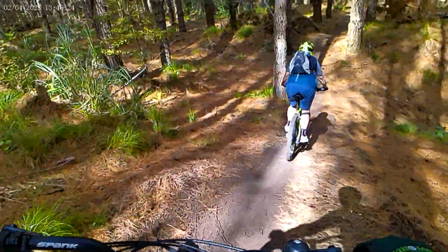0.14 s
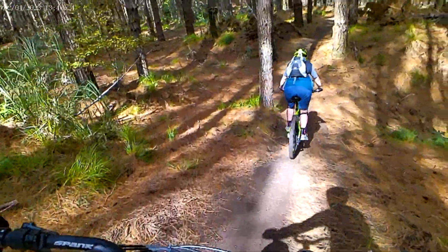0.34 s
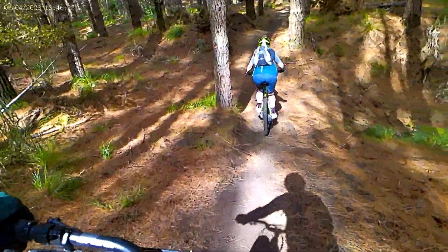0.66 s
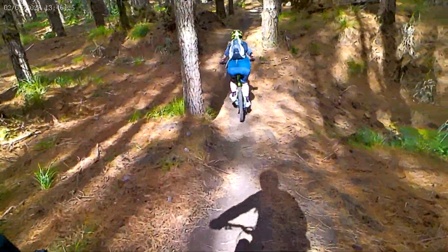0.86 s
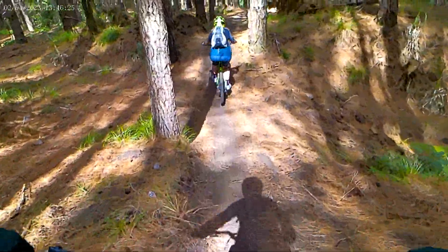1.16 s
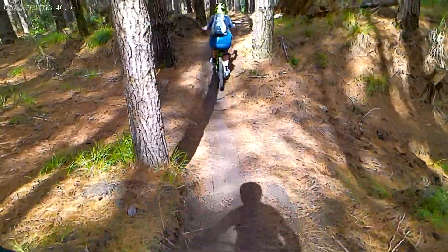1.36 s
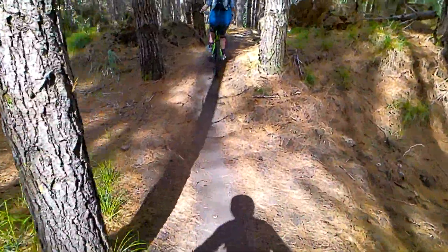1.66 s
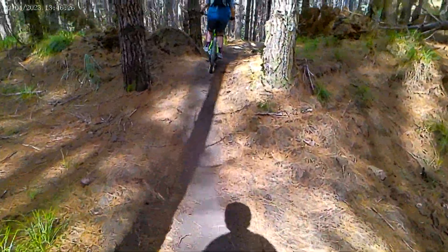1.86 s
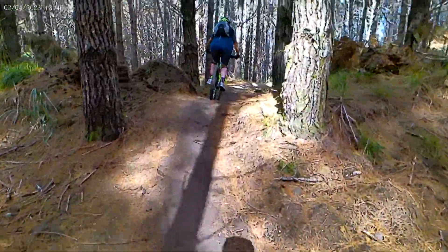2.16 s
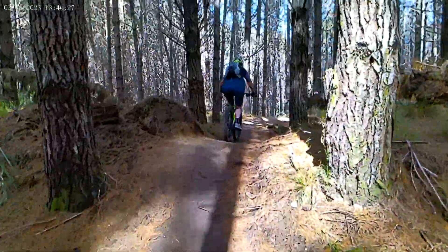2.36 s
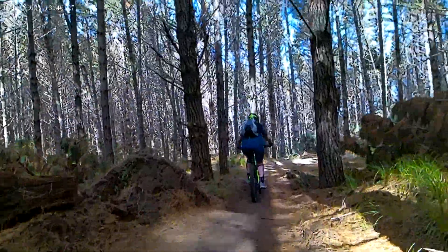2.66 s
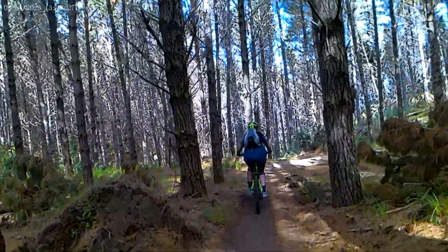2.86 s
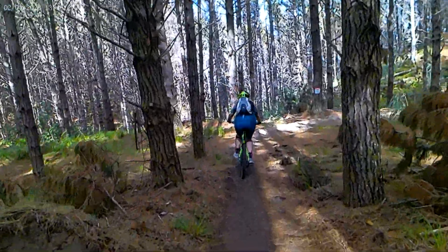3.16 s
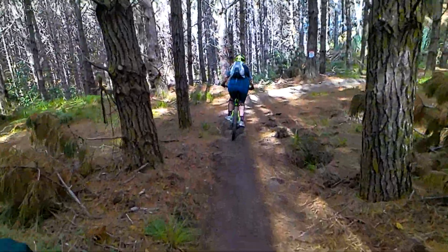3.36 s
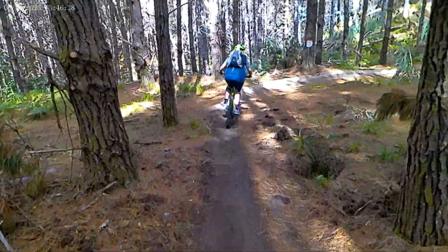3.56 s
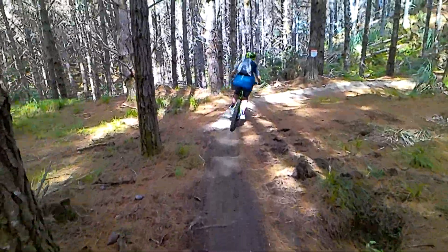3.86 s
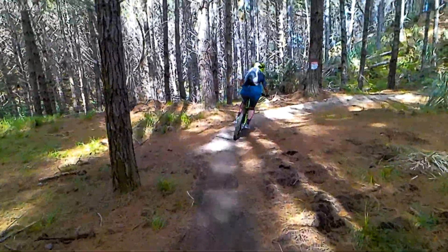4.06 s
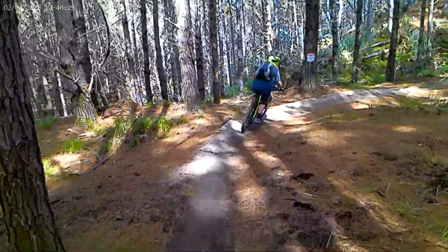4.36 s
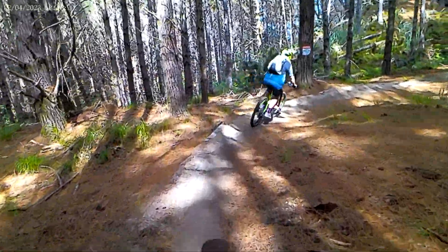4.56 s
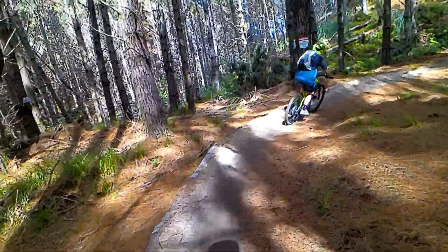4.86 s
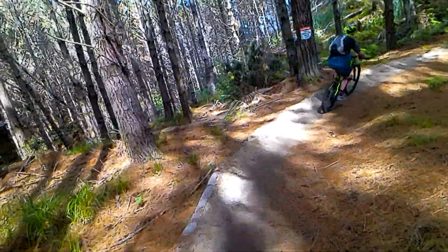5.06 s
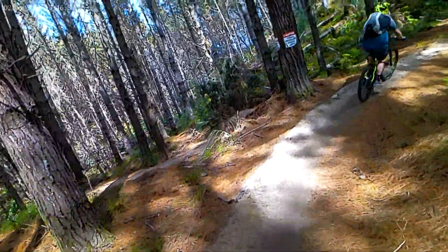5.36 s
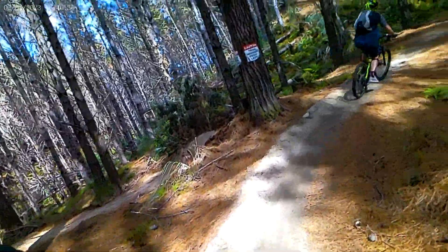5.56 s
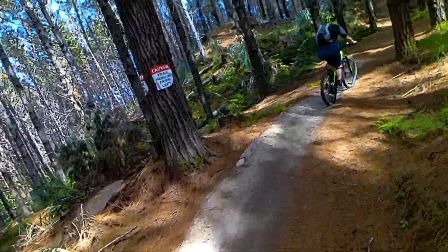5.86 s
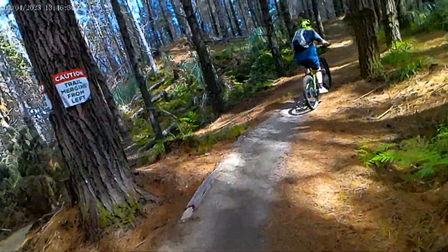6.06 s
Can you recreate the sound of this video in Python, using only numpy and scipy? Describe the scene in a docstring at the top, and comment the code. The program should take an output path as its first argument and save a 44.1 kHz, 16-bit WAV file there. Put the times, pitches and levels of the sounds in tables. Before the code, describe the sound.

Deep, dull jolts shake a close microphone as a bike runs along a dirt trail outdoors. Early bumps are modest; between about 1.4 and 2.6 seconds they become heavy knocks, the hardest clipped and sharp. Later come isolated thuds, a flurry of tiny metallic rattles, a low wind swell and a faint freewheel whirr near the end. Tyre noise and hiss stay low and constant, everything dry.

```python
"""A camera worn by the rider heaves, shudders and thumps as a mountain bike rolls down a packed dirt trail.
Bumps are slow damped swings led by mount and shell rings; knocks on the mount's stop overload at their hardest.
Chain and cables are bouncing clicks that ring frame, links and shell; random pawl ticks ring the hub as a whirr.
Tyres hum, crunch and scuff as shaped noise, over a rumbling wind and a steady hiss."""
import sys
import numpy as np
from scipy import signal
from scipy.fft import rfft, irfft
from scipy.io import wavfile
from scipy.ndimage import map_coordinates

SR = 44100
rng = np.random.default_rng(int(sys.argv[2]) if len(sys.argv) > 2 else 0)


def generate_wav(sig):
    """Save sig (samples, or channels by samples) to the path in sys.argv[1] as 16-bit PCM at SR."""
    pcm = np.round(np.clip(np.atleast_2d(sig).T, -1, 1) * 32767).astype(np.int16)
    wavfile.write(sys.argv[1], SR, pcm)


N = 273861
TIME = np.arange(N) / SR

# Bumps in the trail. Each row: time in seconds, heave level in dB, sharpness (shudder over heave) in dB.
BUMPS = [(0.22, -19, -6), (.412, -15, -6), (0.611, -25.5, -14.5), (.845, -24.5, -3), (1.205, -25.5, -17.5),
         (1.423, -23.5, -9.5), (1.701, -14, -5), (1.976, -13, -9), (2.13, -19, -9.5), (2.35, -12, -10),
         (2.555, -11, -13), (2.959, -22, -14), (3.469, -8.5, -2.5), (4.078, -14.5, -12.5),
         (4.285, -22, -38), (4.37, -26, -10.5), (4.425, -26.5, -22), (4.64, -23, -5), (4.77, -18.5, -20),
         (5.16, -15, -8.5)]
# The mount meets its stop. Each row: time in seconds, thump level before overload in dB, relative crack in dB.
KNOCKS = [(0.9602, -26.5, -49), (1.464, -10, -40), (1.7255, -3.14, -36), (2.2058, 9, -23.5),
          (2.3931, 16.5, -7), (2.6014, 4, -39), (2.78, -24.5, -46), (3.9256, -2.5, -40), (4.828, -28, -46),
          (5.029, -16.5, -41), (5.2, -25.5, -51), (5.3856, -29, -53), (5.5747, -29.5, -49)]
# Rings of the mount and the camera shell. Each row: pitch in Hz, relative level in dB, 60 dB decay in seconds.
MOUNT_MODES = [(95, -11, .07), (135, -7, .09), (190, 1, .04), (275, -7, .03), (410, -12, .03),
               (560, -22, .02)]
SHELL_MODES = [(300, 1, .035), (440, -9, .03), (710, 3, .022), (860, 3, .017), (1280, -6, .018),
               (2000, 0, .009), (2750, -3, .008), (4900, -10, .005)]
# Chain and cables slap the frame. Each row: time in seconds, relative level in dB, share of bare chain 0-1.
RATTLES = [(.82, -41.5, 0.14), (0.837, -42, 0.3), (.983, -41.5, .4), (1.0064, -37.5, 0.02),
           (1.056, -43, 0.08), (1.091, -41, 0), (1.1295, -43, 0.14), (1.492, -34.5, 0.94),
           (1.669, -43.5, 0.48), (2.882, -38.5, 0.67), (3.27, -40.5, 0.39), (3.3252, -37.5, 0.1),
           (3.543, -44, 0.24), (4.24, -38, 0.27), (4.329, -38.5, 0.5), (4.441, -40.5, .4), (4.58, -34, .75),
           (4.6446, -28.5, 0), (4.671, -36.5, 0.3), (4.721, -36, .15), (4.733, -38, 0),
           (4.759, -40.5, 0.36), (4.794, -36, .2), (4.823, -43, .5), (4.96, -32.5, 0.62),
           (4.971, -30.5, 0.25), (5.0302, -36.5, .1), (5.119, -36.5, .2)]
# Rings of the frame, the chain links and the rear hub.
# Each row: pitch in Hz, relative level in dB, 60 dB decay in seconds.
FRAME_MODES = [(1104, 9, 0.0066), (1337, 1, 0.038), (1497, 1.5, 0.026), (1841, 0.5, 0.034),
               (2117, -6, 0.035), (2700, -4.5, 0.0059)]
LINK_MODES = [(3240, 1, 0.012), (3560, 2, .01), (4270, 3.5, 0.018), (4900, -3, 0.018), (5700, -3, 0.011),
              (6440, -6, 0.022), (8000, -4, .015)]
HUB_MODES = [(1260, 1, 0.018), (2040, -1, .014), (2690, -15, 0.048), (3380, -13.5, 0.03),
             (4340, -28, 0.023), (5000, -15, 0.019), (6700, -12, .014), (8580, -15, 0.022)]
# Coasting. Each row: time in seconds, freewheel whirr level in dB.
COASTING = [(0, -65), (3.9, -67.5), (5.2, -64.5), (5.6, -59), (6.0, -56.5), (6.21, -67)]
# The ground under the tyres. Each row: time in seconds, relative hum in dB, relative crunch in dB.
GROUND = [(0.0, -56, -59.5), (0.41, -53.5, -59), (0.71, -55.5, -60), (1.28, -54, -58.5), (2.09, -52, -55.5),
          (2.28, -50, -59), (2.49, -52, -59), (2.75, -51.5, -57.5), (3.2, -53.5, -58), (3.77, -54, -60),
          (3.98, -51, -62), (4.15, -54.5, -57), (4.93, -50.5, -56.5), (5.08, -52.5, -56), (5.5, -53, -59.5),
          (6.21, -54.5, -57.5)]
# Wind at the microphone. Each row: time in seconds, relative level in dB.
GUSTS = [(0, -46), (.55, -48.5), (1.2, -47.5), (1.75, -48.5), (2.25, -42), (2.85, -43), (3.1, -49),
         (3.46, -42), (3.85, -51), (4.08, -40), (4.45, -45), (4.9, -38.5), (5.14, -34.5), (5.4, -43.5),
         (6.21, -46)]
# Noise colours. Each row: frequency in Hz, relative density in dB per Hz.
HUM_SPECTRUM = [(80, -13.5), (140, 0), (200, -1.5), (250, -9), (295, -2.5), (360, -10.5), (425, -8),
                (470, -14.5), (530, -11.5), (620, -15), (850, -18), (1500, -25.5)]
CRUNCH_SPECTRUM = [(500, 3.5), (880, -1), (1000, 4.5), (1110, -4.5), (1270, 4.5), (1410, -7), (1550, 3),
                   (1690, 0.5), (1900, 1), (2350, -8.5), (2600, -8), (3000, -13), (4300, -10), (9000, -21)]
SCUFF_SPECTRUM = [(180, 4.5), (380, 6.5), (700, -10.5), (1100, -8.5), (1650, -12.5), (2300, -23),
                  (4000, -37.5)]
WIND_SPECTRUM = [(14, 5.5), (25, -9.5), (45, -17.5), (85, -11), (140, -19), (250, -38.5), (500, -73)]
HISS_SPECTRUM = [(200, -3), (2000, 10), (3600, 4.5), (4300, 8), (4600, 4.5), (4950, 6.5), (5700, 2),
                 (6900, 6.5), (7600, 3.5), (12000, 5), (16000, 4)]

# A sharper bump heaves the camera faster; the shudder comes just ahead of the heave.
HEAVE_HZ, SHARPNESS_DB_PER_OCTAVE, SHUDDER_LEAD_S = 27.2, 49, .0178
# A stronger knock is higher, harder and shorter: each value at 0 dB, and the dB that double or halve it.
KNOCK_HZ, PITCH_DOUBLING_DB = 87.8, 112
HARDNESS, HARDNESS_DOUBLING_DB = 0.51, 14.5
KNOCK_CYCLES, LENGTH_HALVING_DB = 0.481, 30
TOUCH_LEAD_S, LEAD_HALVING_DB = 0.00597, 50  # first touch, before the peak
RELEASE_LAG_S = 0.0093  # the mount comes free, after the peak
# A cable settles quickly; the chain bounces harder and for longer.
CABLE_SETTLE_S, CHAIN_SETTLE_S = .004, .011
CABLE_REBOUND, CHAIN_REBOUND = 0.45, 1.5
# Faint slaps in between, their level set against the ground's crunch curve.
STRAY_PER_S, STRAY_DB, STRAY_SPREAD_DB = 14, 6, 4.5
# Trims on the ground and gust curves, and the hiss level.
HUM_TRIM_DB, CRUNCH_TRIM_DB, WIND_TRIM_DB, HISS_DB = 0.5, -2.3, 6.5, -59
# Amplitude limit; a higher knee runs into it more abruptly.
OVERLOAD, OVERLOAD_KNEE, CUTOFF_HZ = .705, 25, 15750


def from_db(db):
    """Decibels to gain."""
    return 10 ** (np.asarray(db) / 20)


def rms_one(x):
    """Scale to an rms of 1."""
    return x / np.sqrt(np.mean(x ** 2) + 1e-20)


def in_time(rows):
    """Each column of a curve at every sample."""
    s, *columns = np.transpose(rows)
    return [np.interp(TIME, s, column) for column in columns]


def coloured(x, spectrum):
    """Give a steady excitation a spectrum; rms 1."""
    hz, db = np.transpose(spectrum)
    bins = np.maximum(np.arange(N + 1) * SR / (2 * N), 1)
    gain = from_db(np.interp(np.log(bins), np.log(hz), db))
    # beyond both ends of the curve the level falls 6 dB an octave
    gain = gain * np.minimum(bins / hz[0], 1) * np.minimum(hz[-1] / bins, 1)
    return rms_one(irfft(rfft(x, 2 * N) * gain)[:N])


def drift(rate):
    """Smooth random movement with an rms of 1, heading for a new value rate times a second."""
    knots = rng.standard_normal(4096)
    return rms_one(map_coordinates(knots, [TIME * rate], order=2, mode="wrap"))


def ring(force, modes):
    """A unit click sets each mode ringing at its level; neighbours swing in opposite senses."""
    out = np.zeros(N)
    for k, (hz, db, t60) in enumerate(modes):
        decay = np.exp(-np.log(1000) / (t60 * SR))
        w = 2 * np.pi * hz / SR
        resonator = [1, -2 * decay * np.cos(w), decay * decay]
        out += (-1) ** k * from_db(db) * signal.lfilter([0, np.sin(w)], resonator, force + 1e-18)
    return out


def padded(force, cut_hz):
    """A soft contact spreads the force in time and loses its treble."""
    lowpass = signal.butter(2, min(cut_hz, .45 * SR), fs=SR, output="sos")
    return signal.sosfilt(lowpass, force + 1e-18)


def chatter(rows, rebound, count=8):
    """From rows of (s, dB, length s): a first touch, then dying rebounds of random size at uneven moments."""
    force = np.zeros(N)
    for s, db, length in rows:
        delays = np.append(0, rng.exponential(1, count))
        bounces = rebound * rng.standard_normal(count) * np.exp(-delays[1:] / 2)
        sizes = np.append(1, bounces)
        at = np.clip(((s + delays * length) * SR).astype(int), 0, N - 1)
        # the level sets the energy of the whole burst
        np.add.at(force, at, from_db(db) * sizes / np.linalg.norm(sizes))
    return force


def swing(s, hz, hardness, cycles):
    """One heavily damped to-and-fro; a hard contact starts fast and slows as the padding gives."""
    out = np.zeros(N)
    near = np.abs(TIME - s) < 2 / hz
    t = TIME[near] - s
    hardness = max(hardness, 1e-3)
    turns = np.log(np.maximum(1 + hardness * hz * t, 1e-9)) / hardness
    edge_fade = np.minimum(4 - 2 * hz * np.abs(t), 1)
    out[near] = np.cos(2 * np.pi * turns) * np.exp(-(turns / cycles) ** 2) * edge_fade
    return out


def shudders():
    """The jolt that each bump sends through the bike: rows of (s, dB)."""
    return [(s - SHUDDER_LEAD_S, db + sharp_db) for s, db, sharp_db in BUMPS]


def bumps():
    """Each bump shakes the mount and shell through the rider, then heaves the whole camera slowly."""
    heave = np.zeros(N)
    for s, db, sharp_db in BUMPS:
        hz = HEAVE_HZ * 2 ** (sharp_db / SHARPNESS_DB_PER_OCTAVE)
        heave += from_db(db) * swing(s, hz, hardness=0.88, cycles=0.54)
    shakes = chatter([(s, db, .005) for s, db in shudders()], rebound=0.22)
    shudder = from_db(0.5) * ring(shakes, MOUNT_MODES) - from_db(-23.0) * ring(shakes, SHELL_MODES)
    return heave + padded(shudder, cut_hz=680)


def knocks():
    """A dull thump against the stop: first touch cracks the shell, release leaves shell and mount ringing."""
    thump = np.zeros(N)
    touches = []
    for s, db, crack_db in KNOCKS:
        hz = KNOCK_HZ * 2 ** (db / PITCH_DOUBLING_DB)
        hardness = HARDNESS * 2 ** (db / HARDNESS_DOUBLING_DB)
        cycles = KNOCK_CYCLES * 2 ** (-db / LENGTH_HALVING_DB)
        thump += from_db(db) * swing(s, hz, hardness, cycles)
        touches.append((s - TOUCH_LEAD_S * 2 ** (-db / LEAD_HALVING_DB), crack_db, .001))
    cracks = chatter(touches, rebound=0.28)
    release = chatter([(s + RELEASE_LAG_S, db, .002) for s, db, _ in KNOCKS], rebound=0.057)
    flex = from_db(-2) * np.tanh(release / from_db(18.5))  # the mount can only bend so far
    shell_force = from_db(-5) * padded(cracks, cut_hz=2470) + from_db(-23.5) * padded(flex, cut_hz=960)
    shell = ring(shell_force, SHELL_MODES)
    mount = ring(padded(flex, cut_hz=106), MOUNT_MODES)
    return -(thump + shell + mount)


def rattles(crunch_db):
    """Chain and cables bounce on the frame; bare metal adds a bright click, and both reach the shell."""
    strays = []
    for u, v in rng.random((int(STRAY_PER_S * N / SR), 2)):
        # stray slaps are louder where the ground is rough
        db = crunch_db[int(u * N)] + STRAY_DB + STRAY_SPREAD_DB * (2 * v - 1)
        strays.append((u * N / SR, db, CABLE_SETTLE_S))
    slaps = chatter(strays, rebound=0.91)
    click_rows = []
    for s, db, chain in RATTLES:
        settle_s = np.interp(chain, [0, 1], [CABLE_SETTLE_S, CHAIN_SETTLE_S])
        rebound = np.interp(chain, [0, 1], [CABLE_REBOUND, CHAIN_REBOUND])
        slaps += chatter([(s, db, settle_s)], rebound)
        click_rows.append((s, db + 20 * np.log10(max(chain, 1e-3)), .003))
    clicks = chatter(click_rows, rebound=1.0)
    frame = from_db(-7.0) * ring(slaps, FRAME_MODES)
    links = from_db(-12) * ring(clicks, LINK_MODES)
    shell = ring(from_db(-14.0) * clicks + from_db(-13) * padded(slaps, cut_hz=310), SHELL_MODES)
    return frame + links + shell


def freewheel():
    """Pawls tick so quickly and unevenly that they blur into a whirr in the hub."""
    whirr_db, = in_time(COASTING)
    ticks = (rng.random(N) < 900 / SR) * rng.standard_normal(N)  # about 900 a second
    return from_db(whirr_db) * rms_one(ring(ticks, HUB_MODES))


def tyres(hum_db, crunch_db):
    """Knobs drum on the dirt and crush grit; the tread scuffs while a bump loads the tyre."""
    load = np.zeros(N)
    for s, db in shudders():
        load += from_db(db) * np.exp(-((TIME - s - .004) / 0.016) ** 2)
    grit = (rng.random(N) < 1800 / SR) * rng.standard_normal(N)  # about 1800 grains a second
    hum_gain = from_db(HUM_TRIM_DB + hum_db + 2.0 * drift(22))
    hum = hum_gain * coloured(rng.standard_normal(N), HUM_SPECTRUM)
    crunch_gain = from_db(CRUNCH_TRIM_DB + crunch_db + 3.8 * drift(45))
    crunch = crunch_gain * coloured(grit, CRUNCH_SPECTRUM)
    scuff = from_db(-21.0) * load * coloured(rng.standard_normal(N), SCUFF_SPECTRUM)
    return hum + crunch + scuff


def air(wind_db):
    """Lumpy wind at the microphone port, and the microphone's even hiss."""
    wind_gain = from_db(WIND_TRIM_DB + wind_db + 2.3 * drift(6.7))
    wind = wind_gain * coloured(rng.standard_normal(N), WIND_SPECTRUM)
    hiss = from_db(HISS_DB) * coloured(rng.standard_normal(N), HISS_SPECTRUM)
    return wind + hiss


def scene():
    """Everything is close and in the open, so there is no echo."""
    wind_db, = in_time(GUSTS)
    hum_db, crunch_db = in_time(GROUND)
    camera = bumps() + knocks()
    bike = rattles(crunch_db) + freewheel() + tyres(hum_db, crunch_db)
    return (camera + bike + air(wind_db))[None]


def record(dry):
    """The hardest knocks clip flat, with slightly rounded corners; the extreme treble is cut."""
    clipped = dry / (1 + np.abs(dry / OVERLOAD) ** OVERLOAD_KNEE) ** (1 / OVERLOAD_KNEE)
    lowpass = signal.ellip(10, .1, 70, CUTOFF_HZ, fs=SR, output="sos")
    return signal.sosfilt(lowpass, clipped)


dry = scene()
out = record(dry)
generate_wav(out)
```